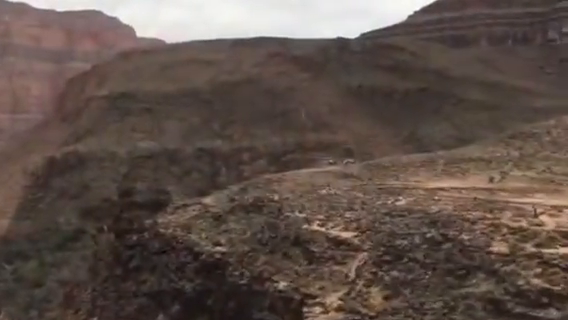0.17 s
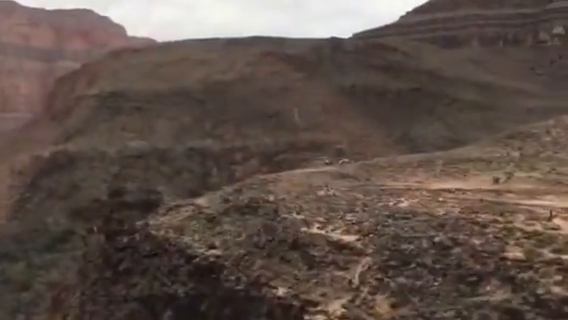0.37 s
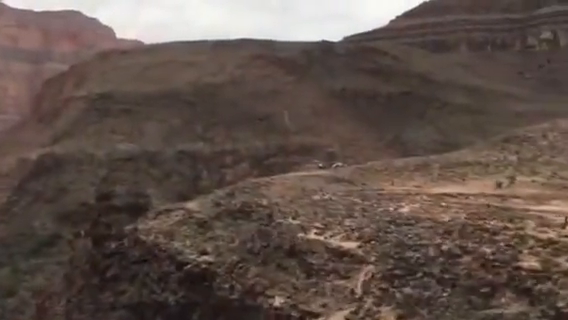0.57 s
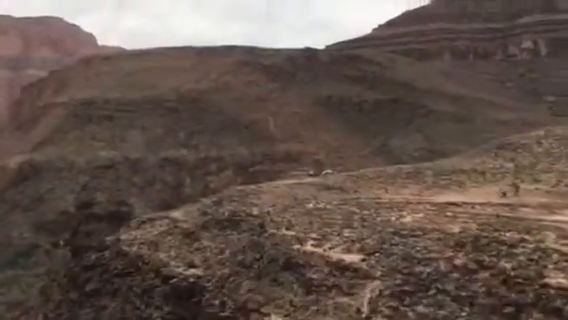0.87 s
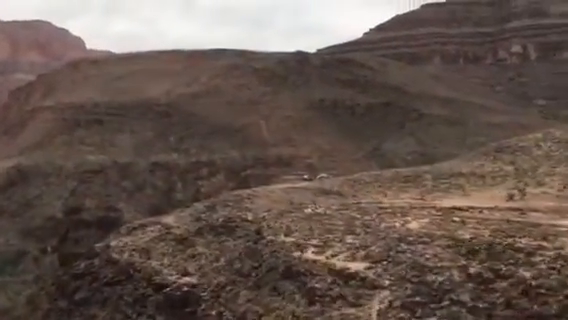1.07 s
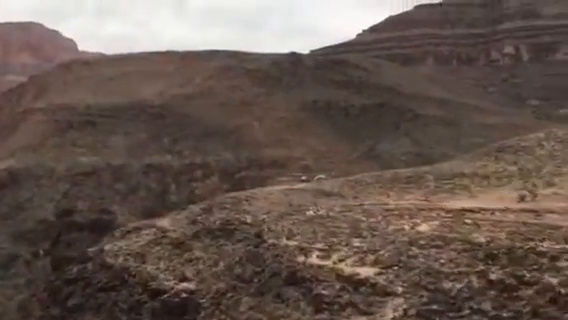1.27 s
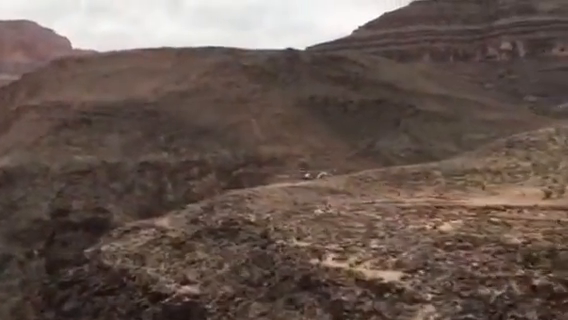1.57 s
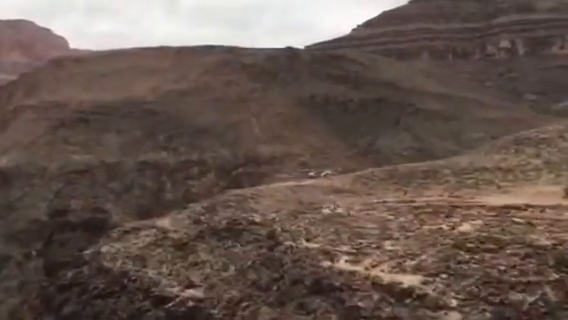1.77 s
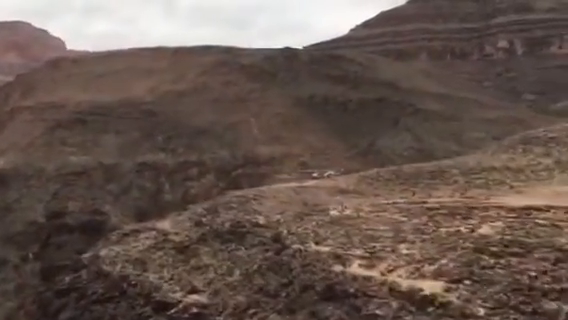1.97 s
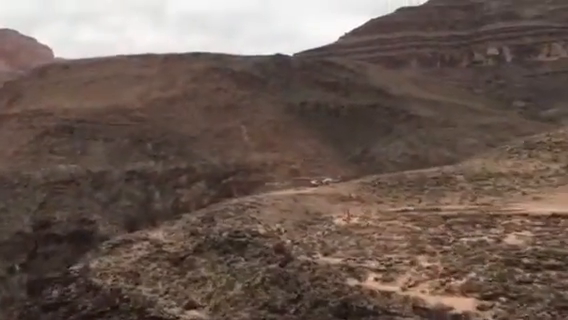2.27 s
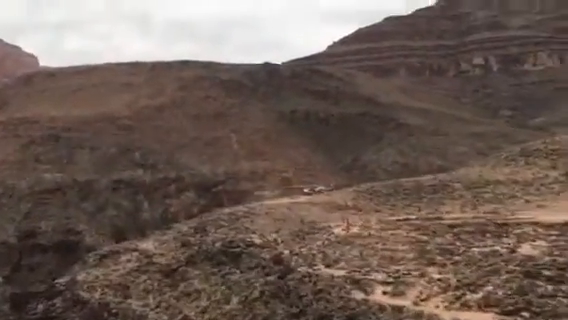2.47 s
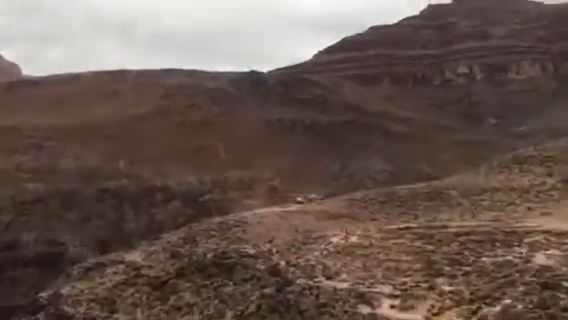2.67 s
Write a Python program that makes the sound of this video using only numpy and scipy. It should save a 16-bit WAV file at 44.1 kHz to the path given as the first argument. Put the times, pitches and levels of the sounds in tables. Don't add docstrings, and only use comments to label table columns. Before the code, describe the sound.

Continuous rapid rotor chopping rings a helicopter cabin, some slaps cracking harder, with broadband engine and wind roar, steady gear tones, a thin whine and brief low hums; small onboard microphone, buffeting stronger toward the end.

```python
import sys
import numpy as np
from scipy import signal
from scipy.io import wavfile

SR = 44100
rng = np.random.default_rng(int(sys.argv[2]) if len(sys.argv) > 2 else 0)


def elevation(decibels):
    levels = np.asarray(decibels, float)
    return 10 ** (levels / 20)


def store_wav(level_fs):
    pcm = np.round(np.clip(np.atleast_2d(level_fs), -1, 1) * 32767)
    wavfile.write(sys.argv[1], SR, pcm.T.astype(np.int16))


N = 123921
T_S = np.arange(N) / SR
BLADE_HZ = 19.475
CRACK_SPREAD_DB = 1.6
RUN_IN_S = 0.25


def in_time(rows):
    s, *columns = np.transpose(rows)
    return [np.interp(T_S, s, c) for c in columns]


def rms_one(x):
    return x / np.sqrt(np.mean(x ** 2) + 1e-20)


def drift(rate_hz):
    r = np.exp(-80 * np.pi * rate_hz / SR)
    slow = signal.lfilter([1], [1, -2 * r, r * r], rng.standard_normal(N // 40 + 2002))[2000:]
    return np.interp(np.arange(N) / 40, np.arange(len(slow)), rms_one(slow - slow.mean()))


def resonate(x, hz, width_hz):
    r = np.exp(-np.pi * width_hz / SR)
    b = [(1 - r * r) / 2, 0, (r * r - 1) / 2]
    a = [1, -2 * r * np.cos(2 * np.pi * hz / SR), r * r]
    return signal.lfilter(b, a, x + 1e-18)


def high_pass(x, hz):
    return signal.sosfilt(signal.butter(2, hz, "high", fs=SR, output="sos"), x)


def banded_noise(spectrum, patchy_db, rate_hz):
    hz, db = np.transpose(spectrum)
    edges = np.geomspace(hz[0], hz[-1], int(2 * np.log2(hz[-1] / hz[0])) + 2)
    white = rng.standard_normal((2, N + SR // 2))
    together = drift(rate_hz / 5)
    out = 0
    for k, (low, high) in enumerate(zip(edges, edges[1:])):
        sos = signal.butter(2, [low, high], "band", fs=SR, output="sos")
        band = signal.sosfilt(sos, white[k % 2])[SR // 2:]
        level = np.interp(np.log(low * high) / 2, np.log(hz), db)
        out = out + elevation(level + patchy_db * (1.1 * together + drift(rate_hz))) * band
    return rms_one(out)


# t/s, delay/ms
SLAP_LAG = [(0, 37.5), (.35, 37.8), (.6, 37.5), (.86, 37.1), (1.06, 36.8), (1.42, 37.0), (1.68, 37.35),
            (1.94, 37.5), (2.2, 37.45), (2.55, 37.8), (2.81, 37.5)]


def slap_times():
    start = np.arange(-2, int(N / SR * BLADE_HZ) + 1) / BLADE_HZ
    return start + np.interp(start, *np.transpose(SLAP_LAG)) / 1000


def blade_turns(s):
    return np.interp(T_S, s, np.arange(len(s)))


def train(s, gains):
    out = np.zeros(N + SR)
    np.add.at(out, ((s + RUN_IN_S) * SR).astype(int), gains)
    return out


def trim(x):
    return x[SR // 4:SR // 4 + N]


# order, level/dB rms
PUSH_ORDERS = [(2, -19.5), (3, -24), (4, -31.5), (5, -38), (6, -33)]
PUSH_LEAD_MS = [12.3, 16.1, 13.9, 9.2, 4.3]


def push(s):
    turns = blade_turns(s)
    out = 0
    for (order, db), lead_ms in zip(PUSH_ORDERS, PUSH_LEAD_MS):
        level = np.sqrt(2) * elevation(db + 0.23 * order * drift(2.5))
        out = out + level * np.cos(2 * np.pi * order * (turns + lead_ms * BLADE_HZ / 1000))
    return out


BLADE_PATTERN = [.5, -.3, -.2]
# t/s, extra level/dB
HARD_PASSES = [(.14, 8), (.45, 6), (.81, 5), (.86, 8), (.96, 5), (1.89, 8), (1.99, 5), (2.04, 13),
               (2.19, 10), (2.35, 6.5), (2.5, 2), (2.66, 11.5)]


def hardness(s):
    extra = np.resize(BLADE_PATTERN, len(s)) + rng.normal(0, 1, len(s))
    for when, db in HARD_PASSES:
        extra[np.argmin(abs(s - when))] = db / CRACK_SPREAD_DB
    return extra


# delay after main slap/ms, level/dB, width/ms
ARRIVALS = [
    (-6.0, -14.2, .6),
    (0.05, -7.2, .47),
    (7.45, -21, .35),
    (11.5, -23.5, .42),
]
# t/s, level/dB
EARLY_VORTEX = [(0, 3.5), (.9, -0.5), (1.7, 2), (2.1, -6), (2.45, -6), (2.81, -12)]
# f/Hz, width/Hz, level/dB
CABIN_MODES = [(133, 14, 0), (148, 27, 10), (207, 24, 7), (272, 14, -3), (358, 58, 6), (455, 15, 2),
               (560, 25, 5), (651, 65, 3), (877, 75, 13)]


def slap(s, extra):
    spread_db, jitter_ms, direct_db = 0.7, 0.08, -8
    chance = rng.normal(0, 1, (len(s), len(ARRIVALS)))
    chance[:, 0] += np.interp(s, *np.transpose(EARLY_VORTEX)) / spread_db
    late_ms = rng.normal(0, jitter_ms, chance.shape)
    t_ms = np.arange(-200, 201) / SR * 1000
    pulses = 0
    for k, (ms, db, width_ms) in enumerate(ARRIVALS):
        gains = -elevation(db + spread_db * (0.5 * extra + chance[:, k]))
        clicks = train(s + (ms + late_ms[:, k]) / 1000, gains)
        pulses = pulses + signal.fftconvolve(clicks, np.exp(-(t_ms / width_ms) ** 2 / 2), "same")
    cabin = sum(elevation(db) * resonate(pulses, hz, width_hz) for hz, width_hz, db in CABIN_MODES)
    return trim(elevation(direct_db) * high_pass(pulses, 140) + cabin)


# f/Hz, width/Hz, level/dB
PANEL_MODES = [(713, 42, 1), (865, 130, -1), (1121, 39, 4), (1297, 106, -10), (1716, 67, -4),
               (2128, 50, -9.5)]


def crack(s, extra):
    level_db, puff_lead_s, puff_decay_s, puff_share, top_hz = 4, 0.0065, 0.019, 0.05, 2100
    gains = elevation(CRACK_SPREAD_DB * extra)
    r = np.exp(-1 / (puff_decay_s * SR))
    swell = signal.lfilter([1], [1, -r], train(s - puff_lead_s, gains))
    puff = swell * rng.standard_normal(N + SR)
    edges = train(s, gains) + 0.4 * train(s - 0.0035, gains) + 0.18 * train(s + 0.014, gains)
    drive = puff_share * puff - edges
    drive = signal.sosfilt(signal.butter(4, top_hz, fs=SR, output="sos"), drive)
    panels = sum(elevation(db) * resonate(drive, hz, width_hz) for hz, width_hz, db in PANEL_MODES)
    return elevation(level_db) * trim(panels)


# f/Hz, level/dB per Hz
BUFFET_SPECTRUM = [(42, -12), (65, -0.5), (88, -4.5), (115, -1.5), (150, -4.5), (190, -8), (240, -16.5)]


def buffet(s, load_db):
    level_db, throb_db, wash_low_hz = -27.5, 2.5, 44
    level = elevation(level_db + load_db + throb_db * np.cos(2 * np.pi * blade_turns(s)))
    return level * high_pass(banded_noise(BUFFET_SPECTRUM, patchy_db=2.0, rate_hz=4.8), wash_low_hz)


# f/Hz, level/dB per Hz
ROAR_SPECTRUM = [(120, -41), (200, -9), (358, -4), (743, -18.5), (1750, -16.5), (1950, -27.5),
                 (10200, -41.5), (11400, -39), (15600, -51)]
LINING_HZ = [250, 490, 1130, 1500, 2520, 2850, 3300, 3800, 4320, 5420, 6540, 7550, 8050, 9520, 10400, 11300]
# width/Hz, boost/dB
LINING_SHAPES = [(102, -13.5), (50, -3), (73, 0), (80, -5), (203, 7.5), (306, -5), (350, 9), (200, 4.5),
                 (240, 5.5), (480, 3), (610, 8.5), (400, -3), (150, 0.5), (160, 6.5), (500, -5.5),
                 (780, 4.5)]
# t/s, level/dB
AIRFLOW = [(0, -0.5), (.4, 1.5), (.9, 0), (1.4, 0), (1.9, 0.5), (2.3, 1), (2.55, 2), (2.81, 2)]


def roar(s):
    level_db, throb_db = -31.5, 0.69
    x = banded_noise(ROAR_SPECTRUM, patchy_db=0.5, rate_hz=9.4)
    for hz, (width_hz, db) in zip(LINING_HZ, LINING_SHAPES):
        x = x + (elevation(db) - 1) * resonate(x, hz, width_hz)
    throb = throb_db * np.cos(2 * np.pi * (blade_turns(s) - 0.2))
    return elevation(level_db + in_time(AIRFLOW)[0] + throb) * x


def tone(hz, db):
    phase = 2 * np.pi * (np.cumsum(hz * np.ones(N)) / SR + rng.random())
    return np.sqrt(2) * elevation(db + 1.0 * drift(9.0)) * np.sin(phase)


# t/s, f/Hz, level/dB rms
WHINE = [(0.0, 11201, -53), (0.22, 11205, -50.5), (0.94, 11202, -51.5), (1.32, 11202, -60),
         (1.89, 11202, -56.5), (2.19, 11205, -61), (2.21, 11201, -53), (2.23, 11199, -66),
         (2.28, 11200, -58), (2.62, 11203, -49.5), (2.79, 11203, -56), (2.81, 11203, -59)]
# multiple of shaft rate, level/dB rms
WHINE_SIDES = [(-6, -80), (-5, -80), (-4, -71), (-3, -70), (-1, -70), (1, -65), (2, -68), (3, -77),
               (4, -70), (5, -77), (6, -82), (9, -78), (10, -82), (12, -82)]


def whine():
    shaft_hz, sides_follow, throb_db = 135.0, 0.5, 1.6
    hz, db = in_time(WHINE)
    swing_db = sides_follow * (db - db.mean())
    sides = sum(tone(hz + k * shaft_hz, level + swing_db) for k, level in WHINE_SIDES)
    throb = throb_db * np.cos(2 * np.pi * BLADE_HZ * (T_S - 0.008))
    return tone(hz, db + throb) + sides


# f/Hz, level/dB rms
GEARS = [(1298.3, -41.5), (1716, -43), (2153, -65), (2596, -64), (3273, -66), (4313, -70), (8048, -77),
         (9512, -74), (9852, -77)]


def gears():
    fade_db = 1.6 * (np.arange(N) - N / 2) / SR
    return sum(tone(hz, db - fade_db * (k == 0)) for k, (hz, db) in enumerate(GEARS))


# t/s, level/dB rms, f/Hz
GUSTS = [
    (.22, -22.5, 98.7),
    (.48, -24.5, 104),
    (1.1, -29, 99.4),
    (1.4, -26.5, 97.5),
    (2.12, -33, 101.9),
    (2.55, -28, 82.3),
    (2.73, -22, 104.3),
]


def boom():
    gust_s = 0.065
    out = 0
    for s, db, hz in GUSTS:
        swell = np.exp(-((T_S - s) / gust_s) ** 2 / 2)
        out = out + np.sqrt(2) * elevation(db) * swell * np.sin(2 * np.pi * (hz * T_S + rng.random()))
    return out


# t/s, push level/dB, slap level/dB, buffet level/dB
ROTOR_LOAD = [(0, -3, -0.5, -3), (.22, -4.5, -3.5, 2), (.36, -4.5, -0.5, 2.5), (.6, -1.5, 0.5, 1),
              (.9, -5, 0, 3.5), (1.2, -6, 1, 0), (1.5, -5.5, -0.5, 4), (1.8, -5, -0.5, 6.5),
              (2.1, -4, -0.5, 2.5), (2.4, -2.5, -2.5, 4), (2.6, -3, -1, 7), (2.81, -1, -3, 11.5)]


def scene():
    s = slap_times()
    extra = hardness(s)
    push_db, slap_db, buffet_db = in_time(ROTOR_LOAD)
    rotor = elevation(push_db) * push(s) + elevation(slap_db) * slap(s, extra) + crack(s, extra)
    return (rotor + buffet(s, buffet_db) + roar(s) + whine() + gears() + boom())[None]


def top_cut(x):
    return signal.sosfilt(signal.butter(12, 15710, fs=SR, output="sos"), x)


def record(dry):
    mix = 0.94 * np.tanh(dry / 0.91)
    return top_cut(mix)


dry = scene()
out = record(dry)
store_wav(out)
```